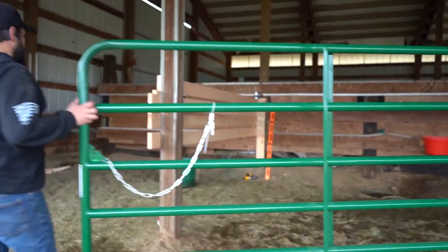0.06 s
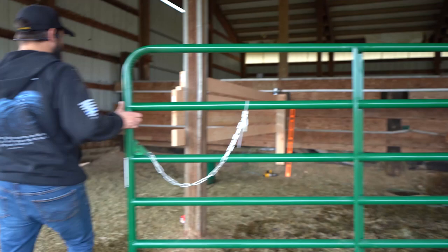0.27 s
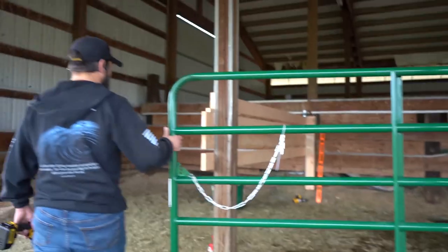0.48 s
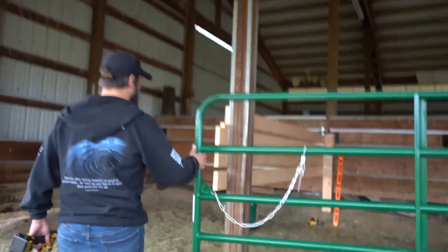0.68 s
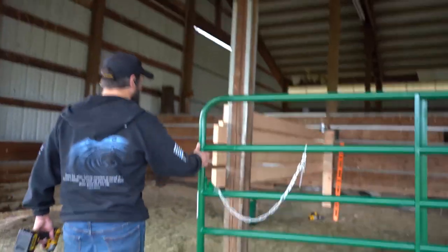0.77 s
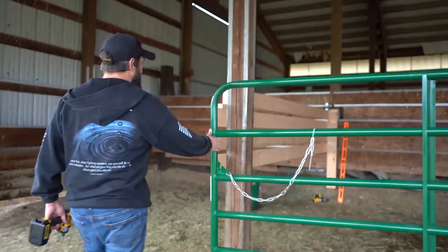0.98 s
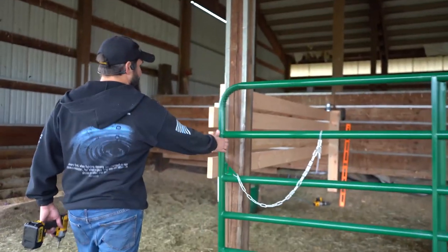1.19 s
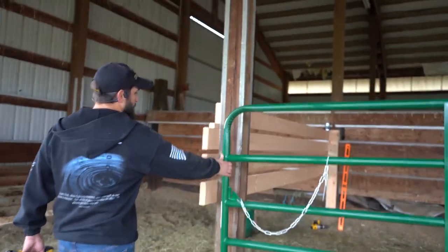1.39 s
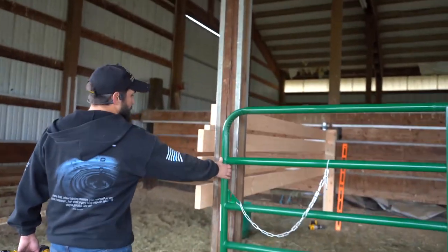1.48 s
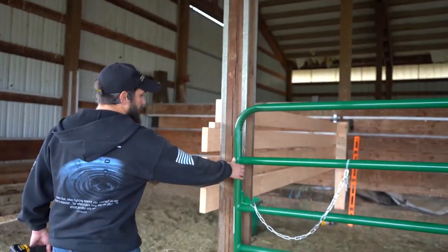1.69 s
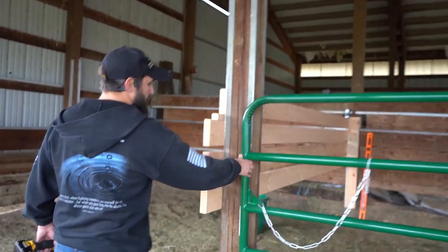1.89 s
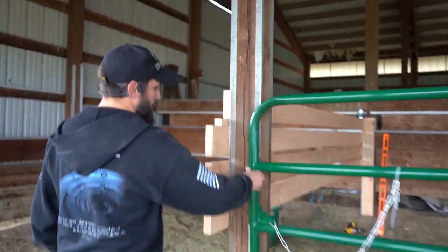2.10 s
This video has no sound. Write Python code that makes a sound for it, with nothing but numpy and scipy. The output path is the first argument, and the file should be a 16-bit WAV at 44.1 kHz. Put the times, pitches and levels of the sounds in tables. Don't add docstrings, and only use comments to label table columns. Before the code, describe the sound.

A steel tube gate swings close by: its chain slaps the bars with a bright ringing clank, then a second rattle, dull hand knocks and boots crackling in straw, in a softly echoing barn with wind throbbing in the microphone.

```python
import sys
import numpy as np
from scipy import signal
from scipy.fft import rfft, irfft
from scipy.io import wavfile
from scipy.ndimage import uniform_filter1d

SR = 44100
rng = np.random.default_rng(int(sys.argv[2]) if len(sys.argv) > 2 else 0)


def materialize(psi):
    bounded = np.clip(np.atleast_2d(psi).T, -1, 1)
    quanta = np.round(bounded * 32767).astype(np.int16)
    wavfile.write(sys.argv[1], SR, quanta)


def invert_db(x):
    u = np.asarray(x, float) / 20
    return 10 ** u


N = 94726


def rms_one(x):
    return x / np.sqrt(np.mean(x ** 2) + 1e-20)


def at_hz(points, hz):
    table_hz, value = np.array(points).T
    return np.interp(np.log(hz), np.log(table_hz), value)


def colour(x, points):
    size = 8192
    hz = np.arange(size // 2 + 1) * SR / size + 1
    level_db = np.maximum(at_hz(points, hz), -90)
    cepstrum = irfft(np.log(invert_db(level_db)))
    cepstrum[1:size // 2] *= 2
    cepstrum[size // 2 + 1:] = 0
    h = irfft(np.exp(rfft(cepstrum)))
    return signal.fftconvolve(x, h / np.sqrt(np.sum(h ** 2)))[:len(x)]


def band(x, low_hz, high_hz, order=2):
    return signal.sosfilt(signal.butter(order, [low_hz, high_hz], "band", fs=SR, output="sos"), x)


def lowpass(x, hz):
    return signal.sosfilt(signal.butter(2, hz, fs=SR, output="sos"), x)


def ring(x, hz, t60):
    r = invert_db(-60 / (t60 * SR))
    w = 2 * np.pi * hz / SR
    return signal.lfilter([0, np.sin(w)], [1, -2 * r * np.cos(w), r * r], x + 1e-18)


def shape(s, rise, length, t60):
    t = np.arange(N) / SR - s
    return np.clip(t / rise, 0, 1) * invert_db(-60 * np.maximum(t - length, 0) / t60)


def strokes(events):
    return sum(invert_db(db) * shape(s, rise, length, t60) for s, rise, length, db, t60 in events)


def grains(per_s, spread_db):
    happens = rng.random(N) < per_s / SR
    size = np.minimum(rng.exponential(1, N), 5)
    sign = rng.choice([-1, 1], N)
    return rms_one(happens * invert_db(spread_db * size) * sign)


def struck(events):
    out = np.zeros(N)
    for s, hz, db, t60 in events:
        click = np.zeros(N)
        click[int(s * SR)] = invert_db(db)
        blow = uniform_filter1d(click, int(SR / hz / 2) + 1)
        out += ring(blow, hz, t60)
    return out


def barn_air():
    # f/Hz, level/dB
    hush = [(100, -23.5), (233, -14.5), (600, -15.5), (1160, -9), (1960, -23), (2930, -17.5), (5000, -29),
            (15500, -44.5)]
    return invert_db(-46.5) * colour(rng.standard_normal(N), hush)


def wind():
    # t/s, rumble/dB, throb/dB
    gust = [(0.0, -24.5, -21), (0.06, -28, -14), (0.15, -26, -16.5), (0.26, -24.5, -6), (0.33, -51, -12.5),
            (0.55, -41, -14), (0.58, -50, -8.5), (0.66, -36.5, -10), (0.76, -39, -7.5), (0.91, -41, -21),
            (1.02, -40, -11.5), (1.33, -31, -13.5), (1.58, -34.5, -12), (1.7, -26, -9.5), (1.94, -19, -8.5),
            (2.0, -29, -8), (2.08, -25, -5), (2.14, -21, -11.5)]
    # f/Hz, level/dB
    rumble_colour = [(15, -22.5), (25, 7.5), (43, -9.5), (76, -19.5), (331, -57.5), (420, -64.5),
                     (500, -52.5), (650, -100), (1100, -120)]
    throb_hz, wander_hz = 18, 1.937
    s, rumble_db, throb_db = np.transpose(gust)
    t = np.arange(N) / SR
    white = rng.standard_normal((2, N + SR))
    wander = rms_one(lowpass(white[0], 5)[SR:])
    throb = np.sin(2 * np.pi * np.cumsum(throb_hz + wander_hz * wander) / SR)
    rumble = colour(white[1], rumble_colour)[SR:]
    draught = rms_one(band(white[0], 27, 48, order=4)[SR:])
    throb_level = invert_db(2.5 + np.interp(t, s, throb_db))
    rumble_level = invert_db(10 + np.interp(t, s, rumble_db))
    return invert_db(-32) * draught + throb_level * throb + rumble_level * rumble


def barn(x, count=12):
    t60_s, wall_cut_hz = 1, 2980
    w = 2 * np.pi * np.fft.rfftfreq(2 * N)
    dull = 1 / (1 + 1j * w * SR / (2 * np.pi * wall_cut_hz))
    h = 0
    for k, lag in enumerate(rng.uniform(.025, .07, count) * SR):
        loop = invert_db(-60 * lag / SR / t60_s) * dull * np.exp(-1j * w * int(lag))
        h = h + (-1) ** k * loop / (1 - loop)
    return irfft(rfft(x, 2 * N) * h)[:N] / np.sqrt(count)


def cloth():
    # t/s, rise/s, length/s, level/dB, dying t60/s
    brushes = [
        (.001, .01, 0.28, -46.5, 0.13),
        (.5, .03, .12, -51, .15),
        (1.186, 0.025, 0.065, -47.5, 0.16),
        (1.627, 0.037, 0.074, -50.5, 0.081),
    ]
    friction = rms_one(band(rng.standard_normal(N), 244, 820))
    return friction * strokes(brushes)


def boots():
    # t/s, rise/s, length/s, level/dB, dying t60/s
    steps = [(0.095, 0.071, .12, -40.5, 0.11), (0.398, 0.023, 0.15, -43, 1), (1.192, 0.13, .14, -47, 0.084),
             (1.331, 0.016, 0.12, -39.5, 0.23), (1.843, .005, 0.019, -40, .1),
             (1.877, 0.046, 0.052, -37, 0.05), (2.023, 0.017, .04, -49.5, .15)]
    # t/s, level/dB
    snaps = [(0.543, -30), (.6664, -37), (1.27, -39), (1.352, -29), (1.59, -33), (1.915, -27), (1.924, -31),
             (2.0457, -30)]
    # f/Hz, level/dB
    straw = [(180, -56), (300, -2.5), (509, -8), (863, -6), (1050, -12), (1110, -1), (2740, 0.5),
             (15500, -24.5)]
    crackle = grains(per_s=5000, spread_db=4) * strokes(steps)
    for s, db in snaps:
        crackle[int(s * SR)] += invert_db(db)
    return colour(crackle, straw)


def thuds():
    # t/s, f/Hz, level/dB, t60/s
    heavy_blows = [(0.263, 170, -32, 0.067), (.714, 412, -27.5, 0.034), (1.438, 300, -38, 0.043),
                   (1.70, 312, -32, 0.1), (1.8, 85, -16, .1), (1.886, 128, -18, 0.074),
                   (1.928, 203, -23.5, 0.035), (2.09, 600, -34, 0.057)]
    return struck(heavy_blows)


def links():
    # t/s, f/Hz, level/dB, t60/s
    tinkles = [(.388, 11063, -37, .35), (.898, 13000, -44, .03), (.41, 12800, -46, .03),
               (1.1129, 6100, -39, .012), (1.1131, 2700, -40, .015), (1.9142, 3000, -33, .01),
               (1.3286, 3100, -33, .02)]
    return struck(tinkles)


def contacts(table):
    touches = grains(per_s=2700, spread_db=2)
    out = np.zeros(N)
    for s, blow_db, rattle_db, length, hard_hz in table:
        force = invert_db(rattle_db - 14) * touches * shape(s, .004, length, t60=.22)
        force[int(s * SR)] += invert_db(blow_db)
        out += lowpass(force, hard_hz)
    return out


def frame_response():
    # f/Hz, level/dB
    frame = [(600, -31), (1000, -10.5), (1430, -3.5), (2300, -5), (3600, -1), (5500, -5.5), (12000, -24),
             (15500, -34)]
    # f/Hz, t60/s
    frame_t60 = [(700, 0.47), (2000, 0.32), (5000, 0.15), (14000, 0.15)]
    t = np.arange(SR) / SR
    white = rng.standard_normal((2, SR))
    out = 0
    edges = 760 * 2 ** np.arange(0, 4.5, 1 / 3)
    for k, (low, high) in enumerate(zip(edges, edges[1:])):
        t60 = at_hz(frame_t60, np.sqrt(low * high))
        out = out + band(white[k % 2], low, high) * invert_db(-60 * t / t60)
    return colour(out, frame)


def gate(size=24):
    # t/s, sharp blow/dB, rattle/dB, rattle length/s, contact hardness f/Hz
    chain_slaps = [
        (.2498, -10, -22, 0.013, 15600),
        (.281, -42, -24.5, 0.024, 6470),
        (.7193, -17, -30, 0.031, 9200),
        (.8051, -24, -30, 0.016, 12500),
        (.832, -56, -29, 0.017, 4420),
        (.885, -28, -31, 0.033, 3450),
    ]
    # t/s, sharp blow/dB, rattle/dB, rattle length/s, contact hardness f/Hz
    hand_knocks = [(.37, -44, -39, .24, 3200), (.004, -33, -50, 0.094, 4150),
                   (1.3284, -23.5, -42.5, 0.064, 4960), (1.465, -41, -36.5, 0.03, 3000),
                   (1.5923, -23.5, -38, 0.057, 2200), (2.03, -55, -47, 0.031, 3000)]
    # f/Hz, level/dB, t60/s
    tube = [(817, -15, 0.88), (891, -14, 2.2), (1031, -9, 1.0), (1210, -17.5, 0.81), (1821, -17, 1.4),
            (2845, -2, 1.6), (2877, -9, .8), (2944, -4, 1.3), (3360, -6, 0.42), (3472, -8.5, 0.37),
            (3824, -8, 0.74), (4400, -4, 0.17), (5440, -13, 0.84), (5570, -11, 0.46)]
    # f/Hz, spread/Hz, level/dB, t60/s
    rings = [(1031, 460, -12.5, 0.8), (2870, 1200, -6, .3), (5455, 600, -7, .33), (8900, 500, -9, .15),
             (12700, 800, -9, .08)]
    tube_db, rings_db, frame_db = -28, -31.5, 5
    grip_s, grip_t60_s = 1.26, .23

    slaps, knocks = contacts(chain_slaps), contacts(hand_knocks)
    held = invert_db(-9.5) * knocks
    free = shape(0, 1e-9, grip_s, grip_t60_s)
    out = np.zeros(N)
    for hz, db, t60 in tube:
        out += invert_db(tube_db + db) * (free * ring(slaps, hz, t60) + ring(held, hz, t60 / 2))
    for hz, spread_hz, db, t60 in rings:
        for u, g, d in rng.random((size, 3)):
            level = invert_db(rings_db + db - 9.5 * u - 5.6 * g)
            out += level * ring(slaps + held, hz + spread_hz * u ** 1.3, t60 * (1.3 - u) * (.5 + d))
    for force in (slaps, knocks):
        out += invert_db(frame_db - 17.5) * signal.fftconvolve(force, frame_response())[:N]
    return out


def scene():
    near = gate() + links() + thuds() + boots() + cloth()
    return (near + invert_db(-6) * barn(near) + barn_air() + wind())[None]


def low_pass(x):
    return signal.sosfilt(signal.butter(12, 16430, fs=SR, output="sos"), x)


def record(dry):
    return low_pass(np.clip(dry, -1, 1))


dry = scene()
out = record(dry)
materialize(out)
```